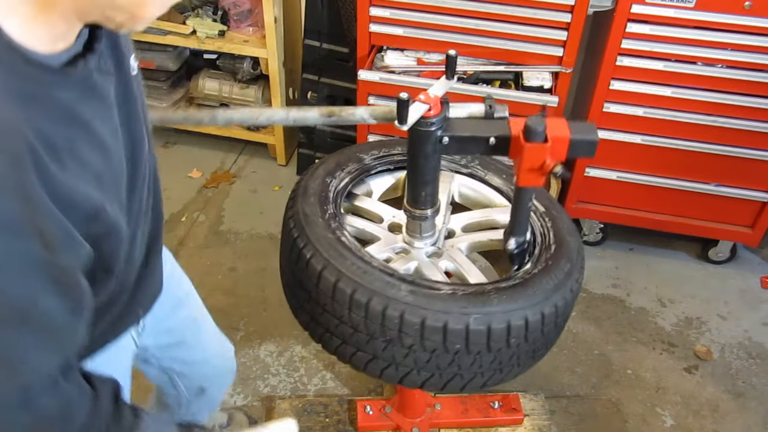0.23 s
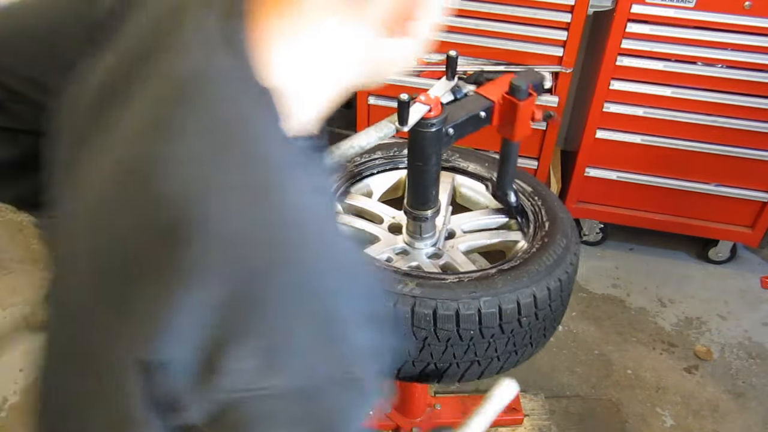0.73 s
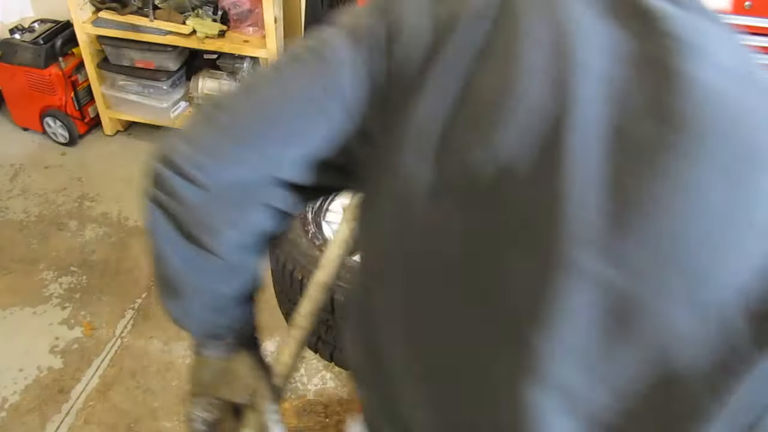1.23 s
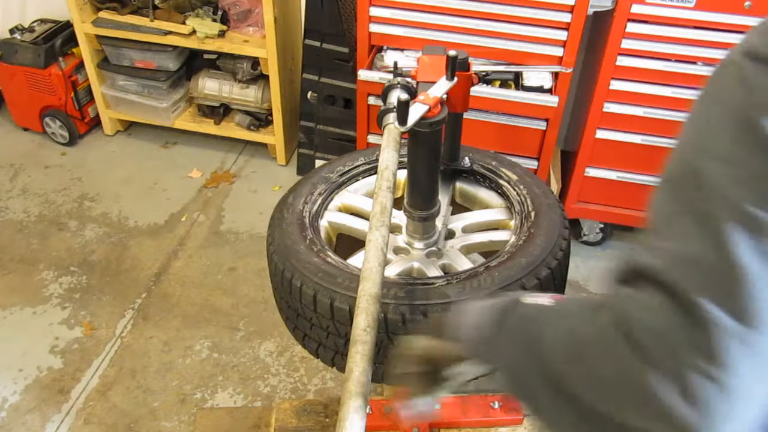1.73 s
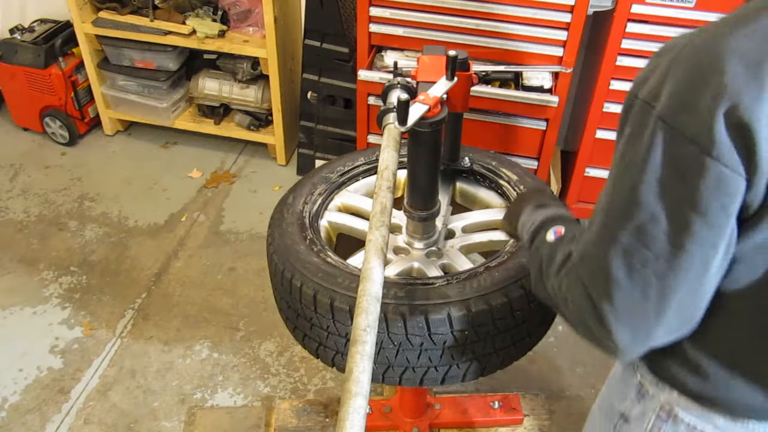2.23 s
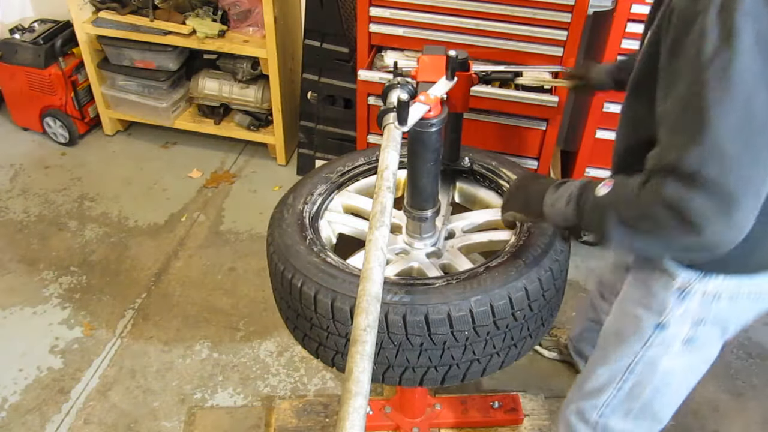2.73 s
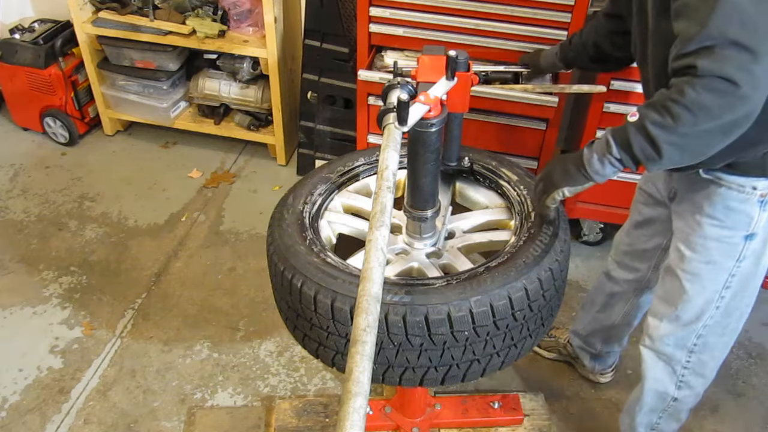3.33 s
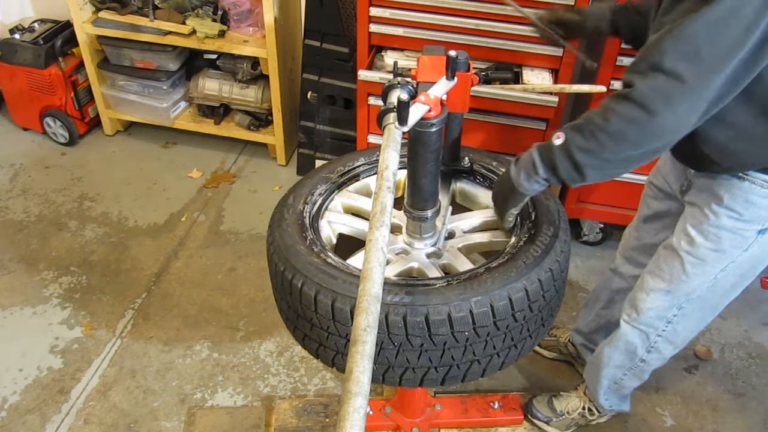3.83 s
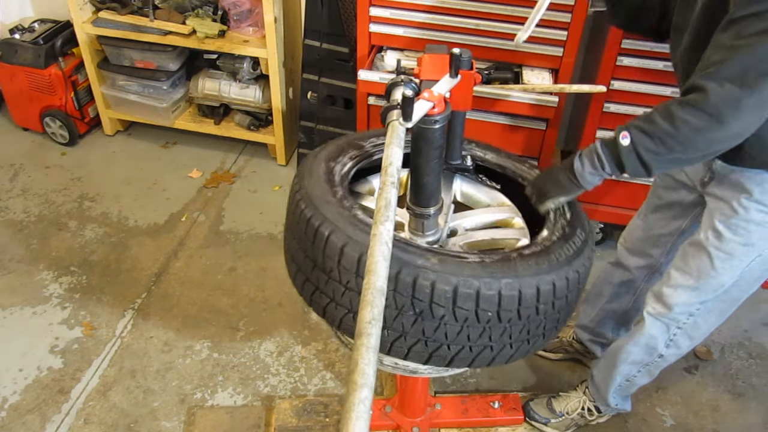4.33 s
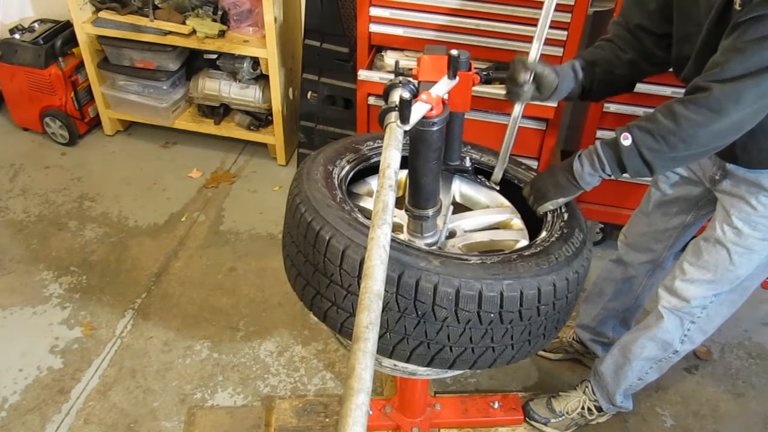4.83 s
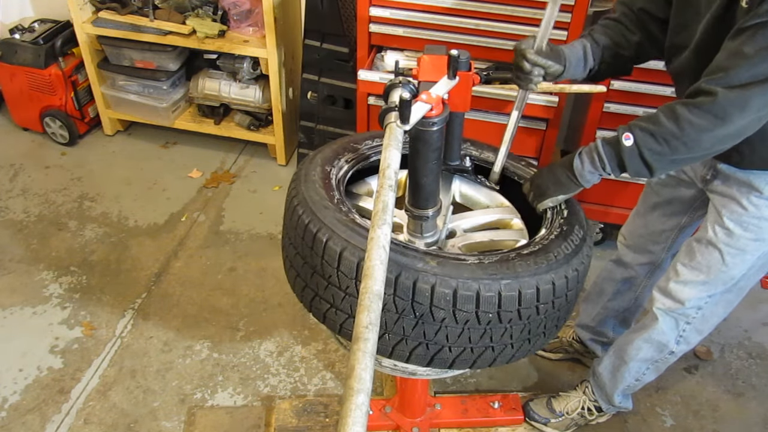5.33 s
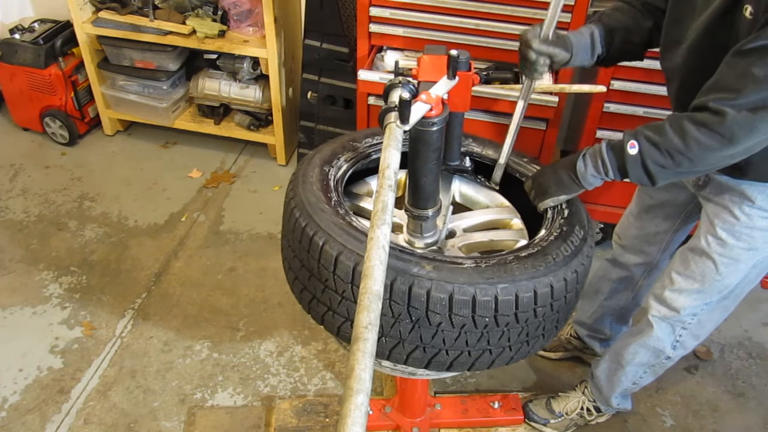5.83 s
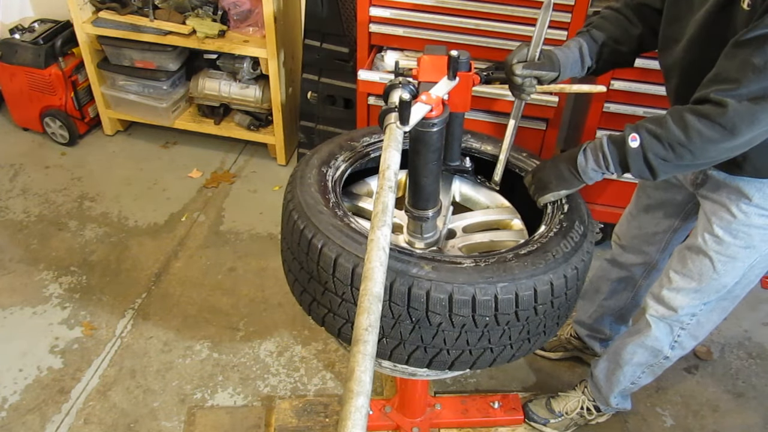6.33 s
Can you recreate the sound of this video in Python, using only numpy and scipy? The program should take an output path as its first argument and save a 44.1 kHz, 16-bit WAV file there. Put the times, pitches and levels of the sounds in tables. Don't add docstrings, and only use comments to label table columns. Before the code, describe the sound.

Steel tire bars clank hard in a concrete garage, with sleeve rustles, a rattling metal drawer hit, a scrape, and ringing wheel-rim knocks.

```python
import sys
import numpy as np
from scipy import signal
from scipy.fft import rfft, irfft
from scipy.io import wavfile
from scipy.ndimage import uniform_filter1d

SR = 44100
rng = np.random.default_rng(int(sys.argv[2]) if len(sys.argv) > 2 else 0)


def wrap_up_sound(samples):
    columns = np.atleast_2d(samples).T
    tamed = np.clip(columns, -1, 1)
    steps = np.round(tamed * 32767).astype(np.int16)
    wavfile.write(sys.argv[1], SR, steps)


def field_ratio(decibels):
    return 10 ** (np.asarray(decibels, dtype=float) / 20)


N = 290178

# frequency in Hz, level in dB, T60 in seconds.
STAND = [(221, -3, 0.45), (334, 0, 0.6), (503, -8, 0.7), (696, -8, 0.51), (1404, -21, 0.79),
         (1957, -23, 1.3), (3487, -14, 1.3), (4159, -13, 0.9), (6755, -21, 1.3), (6916, -21, 1.3),
         (8179, -18, 0.85), (8411, -18, 0.91)]
TIRE = [(218, 0, 0.5), (316, -6, 0.5), (494, -12, 0.5)]
PIN = [(3500, 11, 0.14), (4100, -23.5, 0.18)]
HEAD = [(3070, -39.5, 0.18), (3620, -5.5, 0.78), (4350, 0, 0.26)]
TIP = [(7114, -6, .12), (8556, 0, .2), (9803, -2, .15), (11410, 0, .15), (13990, 0, .15)]
ARM = [(2100, -8, .5), (2970, -8, .6), (3300, -6, 0.6), (3640, -0.5, 0.54), (4420, 2.5, 0.54),
       (4730, -1, 0.52)]
BEAD = [(235, 0, .45), (276, -1, .4), (313, -5, .5)]
KNOCK = [(637, -5, .15), (1829, -1, 0.11), (3930, -12, .08), (5560, -3, 0.039), (10770, -4.5, 0.065)]
HALO = [(10300, 0, .5), (11100, 2, .4), (13300, 4, .3)]
SQUEAK = [(620, -6, .5), (1020, -4, .5), (1270, 0, .2), (1402, -2, .5), (2230, -3, .5), (2800, -6, .5),
          (3390, -6, .4), (3542, -8, .5), (4220, -3, .15), (8580, -1, .2)]
DRAWER = [(540, -6, 0.61), (635, -6, 1.2), (768, -9, 0.54), (1577, -9, 0.81), (1780, -4, 0.9),
          (1845, -4, 1.03), (1945, -8, 1.2), (2140, -4, 0.74), (2405, -7, 0.96), (2640, -2, 0.8),
          (3180, 0, 0.73), (3720, -10, 0.92), (3970, -10, 0.93), (4570, -9, 0.98), (5540, -10, 0.74),
          (5900, -11, 0.76), (6440, -9, 0.72), (7160, -11, 0.71), (7650, -9, 0.6), (8100, -9, 0.6),
          (8400, -9, 0.58), (8770, -8, 0.56)]
CHEST = [(345, -3, 1.4), (615, 0, 1.4), (665, -1, 1.35), (812, -6, 1.4), (930, -2, 0.91), (1295, -7, 1.4),
         (1441, -5, 1.4), (1641, 0, 1.18), (1750, -1, 1.19), (1870, 0, 1.19), (2120, -1, 1.4),
         (2255, 0, 1.16), (2505, -6, 1.05), (2914, -4, 1.4), (3082, -6, 1.4), (3250, -4, 1.26),
         (3695, -1, 1.11), (4570, -9, 1.4), (5455, -6, 1.25), (6310, -13, 0.91), (6910, -13, 0.74)]
SOCKET = [(3544, -4, 0.83), (3814, -4, 0.68), (4430, -1, 0.77), (4845, -1, 0.6), (5300, -4, 0.6),
          (6337, -11, 0.84), (7114, -8, 0.62), (8556, -2, 0.58), (9485, -14, 1.6), (9803, -11, 1.4),
          (10350, -13, 1.21), (11410, -11, 0.84), (13990, -14, 0.71)]
BAR = [(412, -21, 1.21), (526, -21, 1.06), (872, -14, 0.8), (920, -18, 0.91), (1403, -6, 0.92),
       (1724, -6, 0.91), (1790, -11, 0.93), (1995, -6, 0.92), (2265, -7, 0.97), (2534, -1, 0.83),
       (2884, -5, 0.94), (2955, -1, 0.96), (3398, 2, 0.99), (3457, -8, 0.99), (3835, -8, 0.86),
       (4167, -10, 0.83), (4324, -7, 0.77), (4648, -10, 0.78), (4889, -8, 0.76), (5350, -10, 0.75),
       (5468, -11, 0.75), (5938, -9, 0.61), (6435, -8, 0.61), (6608, -9, 0.62), (6802, -9, 0.62),
       (7578, -6, 0.58), (8028, -8, 0.55), (8707, -4, 0.55), (8890, -5, 0.54), (9851, -5, 0.48),
       (10534, -7, 0.49)]
CLANK = [(1694, 1.5, 0.053), (2020, 5, 0.056), (2575, -1.5, 0.3), (2933, -3, 0.32), (3990, -1, 0.052)]
RIM = [(412, -19, 1.6), (536, -7, 1.04), (833, -10, 1.22), (870, -17, 1.43), (920, -17, 1.44),
       (1264, -11, 1.57), (1437, -10, 1.06), (1833, -7, 1.37), (2035, -5, 1.29), (2347, -3, 1.06),
       (2557, -3, 1.0), (2885, 0, 0.9), (2955, -8, 0.98), (3013, -5, 1.07), (3416, -8, 1.0),
       (3665, -5, 0.89), (3802, -7, 0.89), (4167, -12, 0.97), (4332, -10, 0.93), (4840, -10, 0.88),
       (5375, -5, 0.78), (5491, -9, 0.79), (5968, -9, 0.68), (6101, -13, 0.67), (6652, -11, 0.68),
       (7195, -12, 0.65), (7526, -13, 0.67), (8341, -16, 0.67), (9214, -17, 0.73), (9544, -15, 0.7)]
SPOKE = [(215, -11, 0.5), (361, -4, 0.5), (1017, -12, 0.5), (1256, 0, 0.28), (2885, -18, 0.5),
         (3505, -17, 0.5)]
LIP = [(241, -12, 1.15), (363, -7, 1.6), (497, -13, 0.83), (1026, -8, 0.63), (1265, -11, 0.92),
       (1825, -13, 0.99), (2010, -12, 0.97), (2237, -9, 1.1), (2915, -4, 0.7), (3005, -3, 0.73),
       (3365, 0, 0.75), (4383, -11, 0.76)]
CLEAN, LIVELY, RATTLY, LOOSE = 34, 48, 70, 180


def evened(x):
    return x / np.sqrt(np.mean(x ** 2) + 1e-20)


def read(points, hz):
    f, value = np.transpose(points)
    return np.interp(np.log(hz + 1), np.log(f + 1), value)


def add(mix, s, sound):
    part = mix[round(s * SR):][:len(sound)]
    part += sound[:len(part)]


def band(x, lo, hi):
    return signal.sosfilt(signal.butter(2, [lo, hi], "bandpass", fs=SR, output="sos"), x)


def colour(x, points):
    gain = field_ratio(read(points, np.fft.rfftfreq(N, 1 / SR)))
    return evened(irfft(rfft(x) * gain, N))


def grit(per_s, spread_db, hiss):
    size = field_ratio(spread_db * np.minimum(rng.exponential(1, N), 5))
    slips = size * (rng.random(N) < per_s / SR)
    return evened(slips * rng.choice([-1., 1.], N)) + hiss * rng.standard_normal(N)


def stroke(start, hold, rise_s, fall_db_per_s):
    t = np.arange(0, N, 16) / SR - start
    rise = np.sin(np.pi / 2 * np.clip(t / rise_s, 0, 1)) ** 2
    gain = rise * field_ratio(-abs(fall_db_per_s) * np.maximum(t - rise_s - abs(hold), 0))
    return np.repeat(gain, 16)[:N]


def cracks():
    # start in seconds, clack peak in dB, then thud, knock and tick in dB against the clack.
    contacts = [(0.0024, -22.5, 13.5, -4.5, 3.5), (0.764, -39.5, 11, 8, -13), (1.36, -39, 6.5, 9.5, -14),
                (2.01, -42, 12.5, -3, -12), (2.7183, -26, 5.5, 3.5, -27), (2.8917, -9.5, -56, -11.5, 7.5),
                (2.919, -35, -39, -23, -10), (3.154, -28, -31, 0, -6), (3.1969, -10, -12, -3, 1),
                (4.8773, -32.5, 0.5, -1, 1), (5.0436, -5, -55, -30, 7.5), (5.3603, -35, -33, 1, -34.5),
                (5.66, -39, -27.5, 9.5, -6), (5.7339, -20.5, -23, -9.5, -4), (5.993, -7, -39, -29, -3.5),
                (6.221, -27.5, -38, -0.5, -17), (6.5646, -22, -6, -15, -10.5)]
    bands_hz = [(2000, 6000), (90, 400), (500, 2000), (6000, 13000)]
    crack_t60 = [0.17, 0.069, 0.24, 0.082]
    out, t = np.zeros(N), np.arange(6000) / SR
    for s, peak_db, *rel_db in contacts:
        noise = rng.standard_normal((4, len(t)))
        for z, db, (lo, hi), t60 in zip(noise, [0, *rel_db], bands_hz, crack_t60):
            burst = band(band(z * field_ratio(-60 * t / t60), lo, hi), lo, hi)
            add(out, s, field_ratio(peak_db + db - 7.5) * burst / abs(burst).max())
    return out


def rings():
    # (start in seconds, level in dB).
    parts = [(STAND, CLEAN, [(0.001, -27)]), (PIN, CLEAN, [(.1, -46.5), (.32, -49.5), (4.5, -55),
             (4.8, -56)]), (HEAD, LOOSE, [(4.085, -34), (4.16, -33)]), (ARM, LOOSE, [(.835, -50),
             (.857, -39), (.9, -47.5)]), (BEAD, CLEAN, [(4.877, -37.5), (4.943, -42.5)]),
             (KNOCK, LOOSE, [(2.894, -22), (3.198, -17.5)]), (KNOCK[1:2], LOOSE, [(3.183, -27)]),
             (BAR[11:13], CLEAN, [(5.11, -41.5)]), (BAR[:4], CLEAN, [(5.06, -29)]),
             (HALO, CLEAN, [(5.996, -44.5)]), (DRAWER[9:11], CLEAN, [(2.925, -31)]), (RIM[5:11],
             CLEAN, [(6.221, -39.5)]), (LIP[7:], RATTLY, [(6.567, -35)]), (CHEST[16:19],
             CLEAN, [(3.27, -40)]), (TIRE, CLEAN, [(.198, -32), (2.01, -52), (4.215, -45.5),
             (4.375, -43.5)]), (DRAWER, LIVELY, [(2.894, -31), (2.92, -35.5)]),
             (CHEST, LIVELY, [(3.198, -33), (3.29, -38.5)]), (CHEST[1:4], RATTLY, [(3.155, -34)]),
             (CHEST[:1], CLEAN, [(3.5, -36)]), (SOCKET, CLEAN, [(3.48, -41.5)]),
             (TIP, CLEAN, [(3.48, -43.5)]), (SQUEAK, CLEAN, [(4.922, -38)]), (SQUEAK[:6],
             CLEAN, [(4.955, -39.5)]), (SQUEAK[1:2], CLEAN, [(4.95, -36), (4.978, -32), (5.01, -33)]),
             (BAR, CLEAN, [(5.0435, -31)]), (CLANK, CLEAN, [(5.0435, -19), (5.996, -25)]),
             (RIM, LIVELY, [(5.996, -28)]), (SPOKE, CLEAN, [(5.36, -49.5), (5.659, -38.5), (6.567, -36.5)]),
             (LIP, CLEAN, [(5.735, -40)])]
    # time in seconds, extra fall in dB per second, upper
    # limit of the affected modes in Hz.
    all_dampings = [
        (3.55, 70, 2500),
        (5.04, 500, 20000),
        (5.99, 300, 700),
        (6.19, 110, 1000),
    ]
    out = np.zeros(N)
    for modes, blur_hz, blows in parts:
        hz, db, t60 = np.transpose(modes)[:, :, None]
        t = np.arange(64 * int(min(t60.max(), .7) * SR / 64)) / SR
        onset = np.minimum(t * hz / 1.14, 1)
        fade = field_ratio(db - 60 * t / t60) * onset * np.exp(2j * np.pi * hz * t)
        fade = fade * (1 + 0.12 * np.exp(-t / 0.072))
        energy = abs(fade[:, ::64]) ** 2
        settle = np.minimum(t[::64] / .008, 1)
        share = np.clip(14 / blur_hz * np.sqrt(2500 / hz), .1, .45)
        steady = 1 - settle * (1 - share)
        poles = np.exp(-2 * np.pi * blur_hz * np.clip(hz[:, 0] / 1500, .65, 1) * 64 / SR)
        for s, blow_db in blows:
            z = rng.standard_normal((len(modes), len(settle) + 100, 2)) @ [1, 1j]
            z = np.array([signal.lfilter([1], [1, -2 * r, r * r], v)[100:] for r, v in zip(poles, z)])
            waver = steady + (1 - steady) * z / np.std(z, axis=1, keepdims=True)
            waver = waver * np.sqrt(energy.sum(1) / (energy * abs(waver) ** 2).sum(1))[:, None]
            waver = uniform_filter1d(np.repeat(waver, 64, axis=1), size=64, axis=1)
            dampings = [row for row in all_dampings if s < row[0] < s + t[-1]]
            damp = field_ratio(sum(-fall * (hz < top) * np.maximum(t + s - at, 0) for at, fall, top in dampings))
            add(out, s, field_ratio(blow_db) * (damp * fade * waver).imag.sum(0))
    return out


def ticks():
    # start in seconds, peak in dB, centre in Hz.
    spikes = [(.19, -26, 4000), (.205, -22, 4500), (0.6734, -26.5, 2960), (0.821, -29, 3420),
              (0.8596, -35, 4410), (1.2028, -26, 1620), (1.4272, -14.5, 6140), (1.9066, -33, 2640),
              (2.7183, -14.5, 2400), (2.749, -27, 9000), (2.896, 1.5, 7000), (2.8968, -10, 12000),
              (2.904, -20, 9000), (2.909, -26, 4970), (3.2036, -6.5, 5000), (3.336, -22, 7000),
              (3.48, -42, 8000), (3.847, -19.5, 4000), (4.061, -17, 5000), (4.0815, -17.5, 3740),
              (4.0994, -11.5, 3050), (4.11, -15, 2920), (4.154, -4.5, 4960), (4.4003, -17, 3050),
              (4.6402, -26, 7580), (4.878, -24, 2500), (4.971, -24.5, 8000), (4.995, -29, 9000),
              (4.887, -34.5, 3000), (4.9077, -17, 4000), (4.922, -21, 2500)]
    out, t = np.zeros(N), np.arange(400) / SR
    for s, peak_db, hz in spikes:
        push = (t == 0) + .35 * rng.standard_normal(len(t)) * field_ratio(-60 * t / .005)
        spike = band(push, hz / 3, min(hz * 2.5, 15000))
        add(out, s, field_ratio(peak_db - 3.0) * spike / abs(spike).max())
    return out


def scrape():
    # centre in Hz, width in Hz, level in dB.
    resonances = [(3400, 1150, 5), (4760, 360, -9), (7400, 5400, 6)]
    # start in seconds, hold in seconds, level in dB.
    strokes = [
        (0.832, 0.01, -41.5),
        (4.069, 0.097, -28.5),
    ]
    rise_s, fall_db_per_s = 0.015, 123
    slips = grit(1500, 2.8, .8)
    body = sum(field_ratio(db) * evened(band(slips, hz - w / 2, hz + w / 2)) for hz, w, db in resonances)
    push = sum(field_ratio(db) * stroke(s, hold, rise_s, fall_db_per_s) for s, hold, db in strokes)
    return push * evened(body)


def rubs():
    # frequency in Hz, density in dB per Hz.
    spectrum = [(100, 6.5), (250, 10), (1000, 13.5), (3000, 13), (6000, 13.5), (10000, 13.5), (13000, 4),
                (16000, -4.5)]
    # start in seconds, hold in seconds, level
    # in dB, then low rub and bright hiss in dB against it.
    movements = [(0.0, 0.14, -39, -5, -1.5), (.17, 0.017, -37, -10, 2), (.27, 0.13, -44, -8, 0),
                 (0.437, 0.33, -48, -8.5, -1), (.82, 0.049, -38, -8, -3.5), (1.0, 0.37, -49, -5, -2),
                 (1.36, 0.072, -45, -3, -4.5), (1.463, 0.051, -40, -7, -0.5), (1.65, 0.055, -49, -16.5, 6.5),
                 (1.886, 0.048, -45, -8.5, 1), (2.08, 0.087, -50.5, -6.5, 2.5),
                 (3.766, 0.0046, -42, -5.5, 1), (3.87, 0.068, -44.5, -9.5, 4), (4.62, 0.037, -62, 9.5, 9.5),
                 (6.5, 0.11, -47.5, -27, -1),
                 (2.715, 0.052, -43, -3.5, -6), (2.745, 0.087, -39, -8.5, -0.5), (2.89, 0.1, -40.5, -12.5, 1.5),
             (3.102, 0.098, -34.5, -9, -1.5), (3.2, 0.1, -30.5, -9.5, -7), (3.463, 0.021, -37.5, 0, -7),
             (3.55, .2, -61.5, -10, 8.5), (4.045, .01, -42, -9.5, -0.5), (4.08, 0.19, -32.5, -10, -4),
             (4.379, 0.019, -46.5, 6, 3), (4.904, 0.083, -37.5, -15, 0.5), (4.975, 0.04, -41.5, -14, 8.5)]
    fall_db_per_s = [94, 110, 117]
    rise_s = 0.014
    sound = colour(grit(2500, 2.5, .8), spectrum)
    bands_hz = [(1050, 6500), (120, 1400), (5000, 17000)]
    parts = [evened(band(sound, lo, hi)) for lo, hi in bands_hz]
    power = np.zeros((len(parts), N))
    for start, hold, level_db, *rel_db in movements:
        for k, db in enumerate([0, *rel_db]):
            gain = field_ratio(level_db + db - 0.5) * stroke(start, hold, rise_s, fall_db_per_s[k])
            power[k] += gain ** 2
    return (np.sqrt(power) * parts).sum(0)


def garage(x):
    # frequency in Hz, T60 in seconds.
    decay = [(100, 0.14), (400, 0.88), (1500, 1), (4000, 0.83), (8000, 0.53), (15000, 0.31)]
    taps = np.zeros(SR)
    at = np.arange(200, SR - 20, 20)
    taps[at + rng.integers(0, 20, len(at))] = rng.choice([-1., 1.], len(at))
    hz, t, z = signal.stft(taps, SR, nperseg=256)
    t60 = np.maximum(read(decay, hz), .05)[:, None]
    tail = signal.istft(z * field_ratio(-60 * t / t60), SR, nperseg=256)[1]
    return signal.fftconvolve(x, tail / np.linalg.norm(tail))[:N]


def floor():
    # frequency in Hz, density in dB per Hz.
    hiss_spectrum = [(35, -73), (60, -8), (281, -10), (380, -14.5), (1110, -18), (6580, -23.5), (8120, -21),
                     (16000, -24)]
    # frequency in Hz, level in dB.
    whines = [(7881, -69)]
    # start in seconds, hold in seconds, level in dB.
    puffs = [(0.0, 0.023, -43), (.6, 2.3, -64), (3.34, 0.27, -57.5), (4.206, 0.089, -53.5),
             (4.797, 0.15, -66.5), (5.9, 0.74, -71)]
    # time in seconds, drop in dB.
    ducks = [
        (2.9, -11),
        (5.045, -18.5),
    ]
    hiss_db, duck_s, recover_db_per_s = -54.5, .03, 11.5
    hiss = field_ratio(hiss_db) * colour(rng.standard_normal(N), hiss_spectrum)
    whine = sum(field_ratio(db) * evened(band(rng.standard_normal(N), hz - 15, hz + 15)) for hz, db in whines)
    air = sum(field_ratio(db) * stroke(s, hold, 0.054, 57.5) for s, hold, db in puffs)
    rumble = air * evened(band(rng.standard_normal(N), 21, 50))
    t, gain_db = np.arange(N) / SR, np.zeros(N)
    for s, drop_db in ducks:
        recovery = np.minimum(drop_db + recover_db_per_s * (t - s), 0)
        gain_db += np.clip((t - s) / duck_s, 0, 1) * recovery
    return field_ratio(gain_db) * (hiss + whine) + rumble


def scene():
    crack, tick, ring, rub = cracks(), ticks(), rings(), rubs() + scrape()
    late_wet_db = -6 * (np.arange(N) > 5.03 * SR)
    wet = garage(field_ratio(-1 + late_wet_db) * crack + field_ratio(-1) * tick + field_ratio(-14) * ring + field_ratio(-6.5) * rub)
    return np.tile(band(crack + tick + ring + rub + wet, 90, 16000) + floor(), (2, 1))


def low_pass(x):
    return signal.sosfilt(signal.butter(12, 16220, fs=SR, output="sos"), x)


def record(dry):
    # frequency in Hz, level in dB.
    response = [(60, 0), (10500, 0), (12000, -7), (13500, -11), (15800, -14), (16300, -45)]
    # time in seconds, lower and upper corner in Hz.
    splits = [(.5, 4200, 5300), (.5, 9600, 11200), (.99, 5200, 7000), (1.455, 4700, 8400),
              (1.62, 8300, 9700), (2.5, 9600, 12400), (2.75, 6700, 8300), (2.895, 4500, 12000),
              (4.1, 4500, 12000), (4.75, 4700, 6400), (5.03, 6900, 8300), (5.63, 8300, 10400)]
    mono = irfft(rfft(dry[0]) * field_ratio(read(response, np.fft.rfftfreq(N, 1 / SR))), N)
    mono = 1.2 * np.tanh(mono / 1.2)
    t, side = np.arange(N) / SR, np.zeros(N)
    for s, lo, hi in splits:
        patch = np.clip(1.5 - abs(t - s) / .012, 0, 1)
        side += field_ratio(-5) * band(band(np.roll(mono, 23) * patch, lo, hi), lo, hi)
    return low_pass(np.array([mono + side, mono - side]))


dry = scene()
out = record(dry)
wrap_up_sound(out)
```